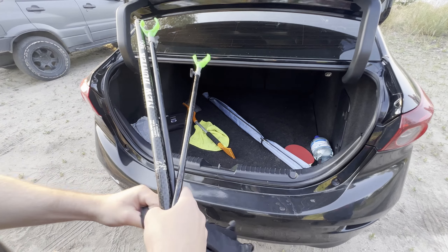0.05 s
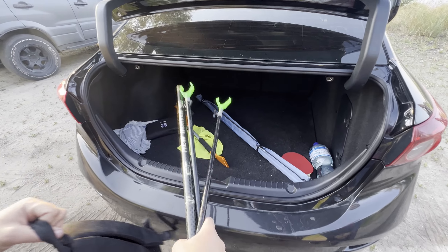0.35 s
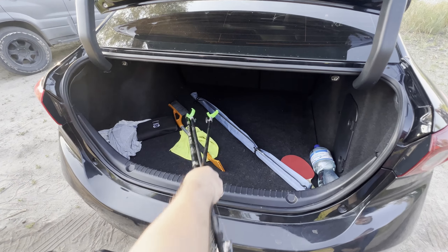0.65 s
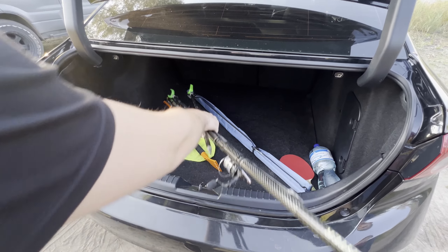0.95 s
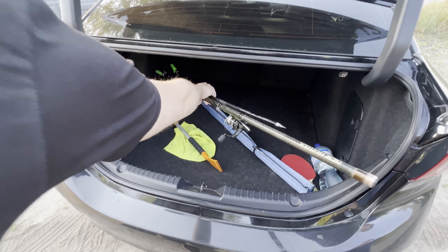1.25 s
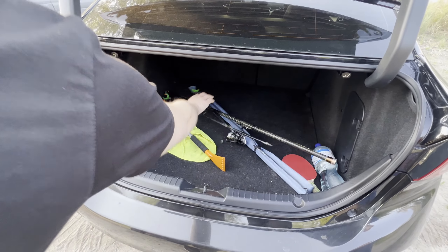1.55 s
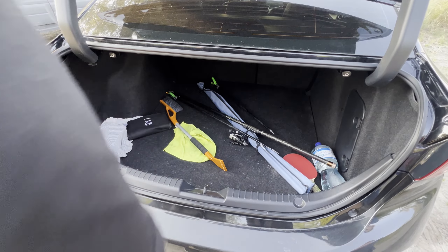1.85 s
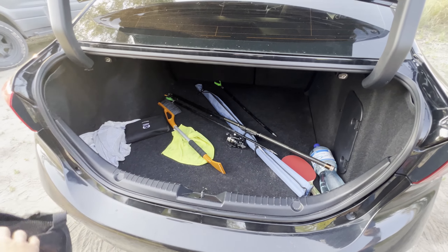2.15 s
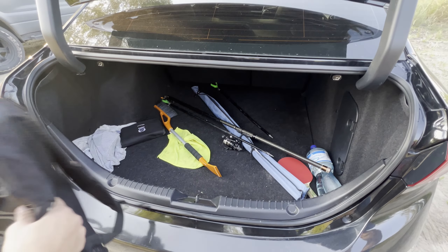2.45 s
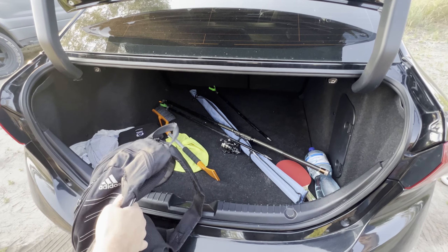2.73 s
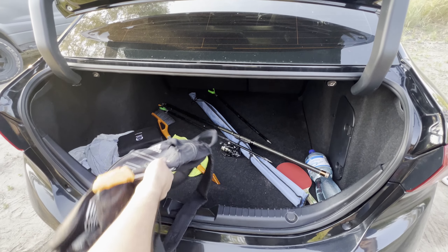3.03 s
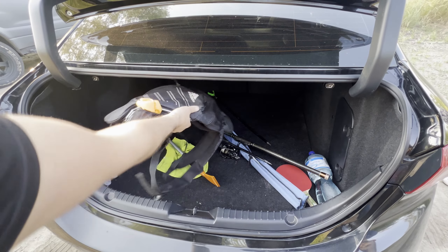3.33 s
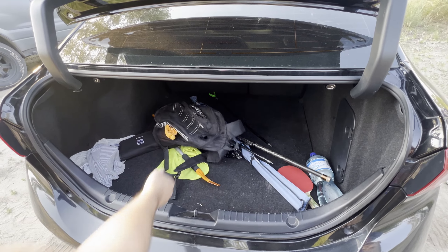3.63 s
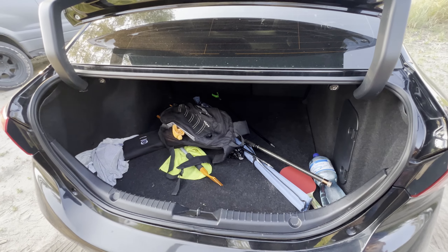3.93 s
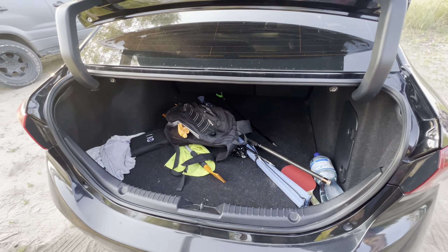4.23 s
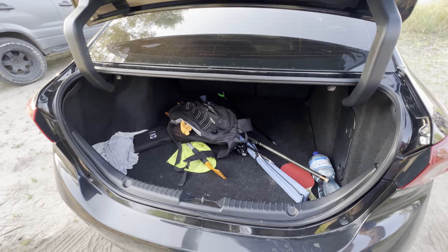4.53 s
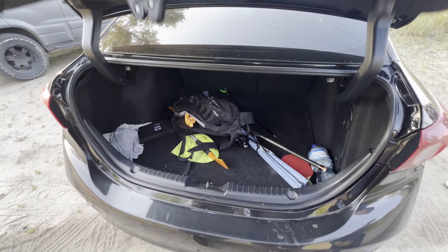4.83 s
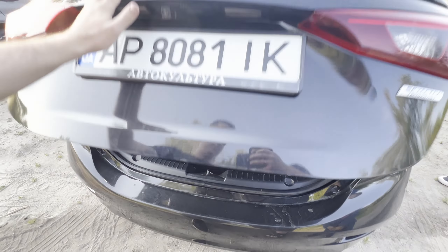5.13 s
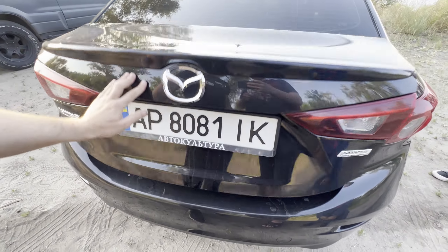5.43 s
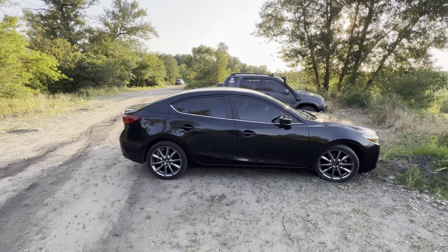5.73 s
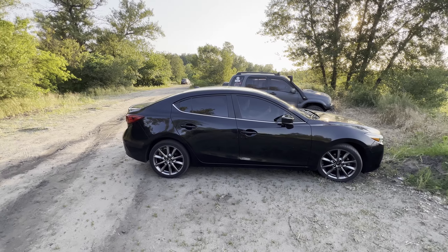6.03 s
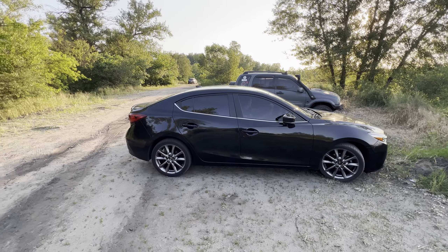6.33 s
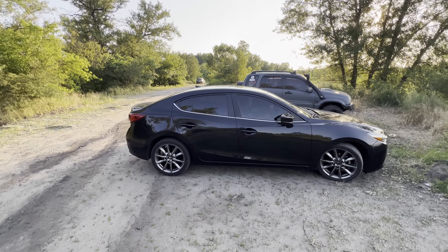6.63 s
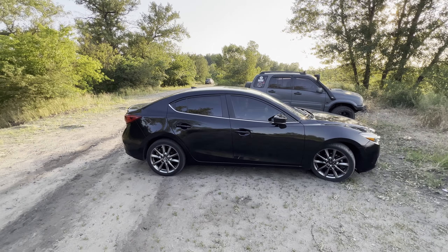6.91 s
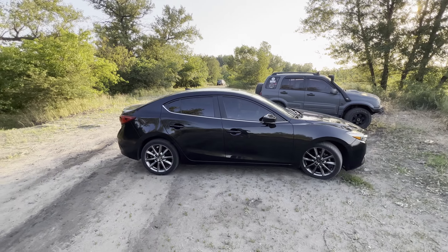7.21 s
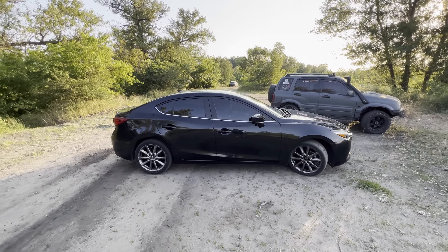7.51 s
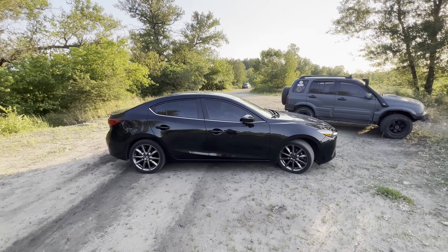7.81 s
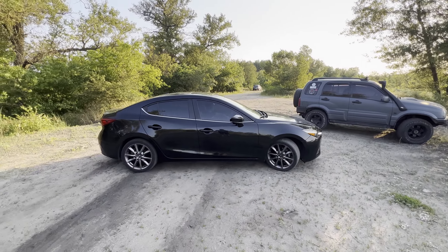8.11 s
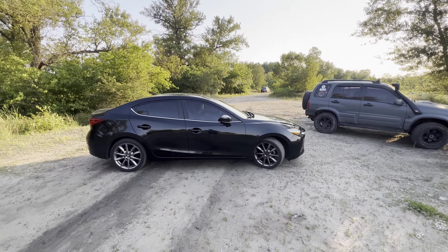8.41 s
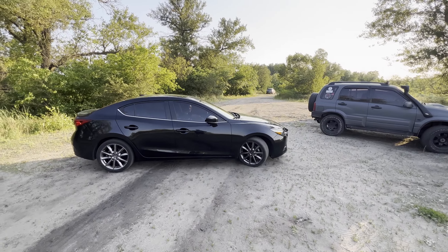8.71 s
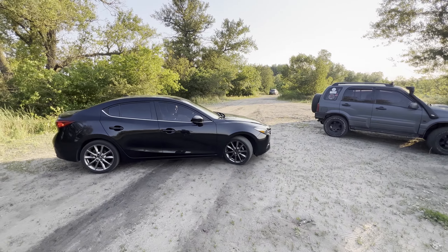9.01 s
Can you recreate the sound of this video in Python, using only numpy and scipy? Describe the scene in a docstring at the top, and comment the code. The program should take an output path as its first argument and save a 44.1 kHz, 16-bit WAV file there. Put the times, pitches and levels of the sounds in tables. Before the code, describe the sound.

Close to an open car boot outdoors, fishing rods clack and rattle onto the carpeted floor. A nylon backpack rustles and lands with a thud and a faint jingle of zip pulls. The hinges groan softly, a hand pats the lid, and it slams with a metallic boom. The sound then cuts to an off-road car some metres away, revving gently and crawling nearer over thin hiss and light wind.

```python
"""On a dirt track, close to a car's open boot, with thin outdoor hiss and light wind on the microphone.
Fishing rods clack and rattle onto the carpeted floor; a backpack follows with nylon rustle, jingling
zip pulls and a thud. The hinges groan, a hand pats the lid, and it slams: sheet metal rings, air booms.
Right after the slam the scene jumps to a spot some metres away, where an off-road car revs gently and
crawls past, exhaust pulsing and engine bay whirring, with ticks of stones and a few soft footsteps."""
import sys
import numpy as np
from scipy import signal
from scipy.fft import rfft, irfft, next_fast_len
from scipy.io import wavfile
from scipy.ndimage import uniform_filter1d

SR = 44100
rng = np.random.default_rng(int(sys.argv[2]) if len(sys.argv) > 2 else 0)


def materialize(psi):
    """Save the field psi as 16-bit PCM at rate SR to the path in sys.argv[1].

    A 1-D psi becomes a single channel; in a 2-D psi each row is a channel.
    """
    bounded = np.clip(np.atleast_2d(psi).T, -1, 1)
    quanta = np.round(bounded * 32767).astype(np.int16)
    wavfile.write(sys.argv[1], SR, quanta)


N = 399678
TIME = np.arange(N) / SR
AGE = TIME[:16384]  # seconds since a blow
JUMP_S = 5.667  # from the boot to the trackside

# Modes of the rod tubes and reel. Each row: frequency in Hz, level in dB, nominal t60 in seconds.
ROD_MODES = [(1237, -7, .05), (2517, -9, 0.11), (2980, -4, 0.079), (3284, 4.5, 0.039), (3700, -7, 0.044),
             (3920, 0, 0.044), (4770, -2, 0.058), (5047, 4, 0.051), (5980, -7, 0.045), (7000, -21, 0.055),
             (8110, -1, 0.049), (9060, -7, 0.09), (9800, -15, 0.14)]
# Spectrum of a hard contact. Each row: frequency in Hz, level in dB.
CLACK_SPECTRUM = [(200, -5.5), (450, -6.5), (1200, -1), (2000, -2.5), (3300, -1), (5500, -4.5), (9000, -9),
                  (15000, -14.5)]
# Spectrum of the struck lid. Each row: frequency in Hz, level in dB.
LID_SPECTRUM = [(88, -30), (150, -14), (283, -7.5), (350, -15), (416, -4.5), (701, -20), (1350, -11),
                (2140, -24), (5720, -28.5), (7640, -36), (8750, -34), (10400, -47), (15000, -52)]


def undb(db):
    """Decibels to gain."""
    return np.exp(np.asarray(db) * np.log(10) / 20)


def unit(x):
    """Scale to rms 1."""
    return x / np.sqrt(np.mean(x ** 2))


def curve(rows):
    """A line through rows of time in seconds and value."""
    return np.interp(TIME, *np.transpose(rows))


def response(hz, points):
    """Gain at hz of a spectrum given as rows of frequency in Hz and level in dB."""
    f, db = np.transpose(points)
    return undb(np.interp(np.log(hz + 1e-3), np.log(f), db))


def colour(x, points):
    """Give a sound a spectrum that falls away below its first point; rms 1."""
    size = next_fast_len(len(x), True)
    hz = np.fft.rfftfreq(size, 1 / SR)
    low_cut = np.minimum(hz / points[0][0], 1) ** 2
    return unit(irfft(rfft(x, size) * response(hz, points) * low_cut, size)[:len(x)])


def noise(points, size=N):
    """Coloured noise of rms 1."""
    return colour(rng.standard_normal(size), points)


def burst(points):
    """Coloured noise, long enough for one blow."""
    return noise(points, len(AGE))


def band(x, hz, width):
    """A resonance with gain 1 at its centre."""
    return signal.lfilter(*signal.iirpeak(hz, hz / width, fs=SR), x)


def walk(rate):
    """Smooth random wandering, with rate turns a second."""
    hold = int(SR / rate)
    steps = np.repeat(rng.standard_normal(N // hold + 1), hold)
    return 1.75 * uniform_filter1d(steps, hold)[:N]


def fade(t60, rise=0.00044):
    """Envelope of a blow: quick rise, exponential decay, top 1."""
    shape = (1 - np.exp(-AGE / rise)) * np.exp(-np.log(1000) * AGE / max(t60, .01))
    return shape / shape.max()


def swells(rows):
    """Gain of overlapping strokes; each grows 20 dB in its rise time and dies 20 dB in its fall time."""
    power = 0
    for s, db, rise, fall in rows:
        from_peak = np.maximum((s - TIME) / rise, (TIME - s) / fall)
        power += undb(db - 20 * np.minimum(from_peak, 10)) ** 2
    return np.sqrt(power)


def ring(modes):
    """Decaying modes (Hz, dB, t60 in seconds), struck at a new spot each time; starts near rms 1."""
    tones = 0
    for hz, db, t60 in modes:
        detuned_hz = hz * (1 + 0.0097 * (rng.random() - .5))
        tones += undb(db) * fade(t60) * np.sin(2 * np.pi * (detuned_hz * AGE + rng.random()))
    return tones / np.sqrt(sum(undb(db) ** 2 for _, db, _ in modes) / 2)


def add(out, s, sound):
    """Mix a sound in at s seconds."""
    i = int(s * SR)
    out[i:i + len(sound)] += sound[:N - i]


def outdoors(hiss_db=-51, breeze_db=-57.5, eddy_db=7.0):
    """Smooth distant hiss, and a low rumble from wind on the microphone and soft footsteps."""
    # Spectrum of the hiss. Each row: frequency in Hz, level in dB.
    hiss_spectrum = [(88, -43), (150, -2), (230, -11), (258, 3), (352, -4.5), (445, 0), (481, -3),
                     (827, -5), (1270, -5), (1660, -4.5), (2920, -7.5), (5870, -2), (7560, -12.5),
                     (8490, -7), (15500, -46)]
    # Drift of the hiss. Each row: time in seconds, gain in dB.
    hiss_drift = [(.3, -2), (1.0, 0), (3.9, -1), (4.9, -2.6), (5.6, -1.5)]
    # Low swells of rumble: wind gusts and soft footstep thumps.
    # Each row: peak time in seconds, level in dB, rise and fall in seconds.
    low_swells = [(.22, -46, 0.15, 0.41), (2.02, -48.5, 0.28, 0.44), (2.66, -48, 0.087, 0.21),
                  (4.45, -49, 1, 1), (7.68, -42.5, 0.11, 0.22), (8.49, -43, 0.049, .12),
                  (8.73, -40.5, 0.19, 0.16), (8.9, -35, 0.22, 0.21), (9.04, -37, .07, .2)]
    rumble = noise([(48, -4), (62, 6.0), (110, -4.5), (180, -7.5), (300, -18), (1000, -42), (5000, -75)])
    hiss = noise(hiss_spectrum) * undb(hiss_db + curve(hiss_drift))
    eddies = undb(eddy_db * np.tanh(walk(15)))
    return hiss + rumble * np.hypot(swells(low_swells), undb(breeze_db)) * eddies


def tinks(gain_db=-8, width=0.32, click_db=-12):
    """Buckles and grit tick in one narrow range, with a faint broad click."""
    # Tiny contacts. Each row: start in seconds, level in dB, pitch in Hz, t60 in seconds.
    contacts = [(1.979, -45, 11400, .046), (3.478, -26, 12300, 0.073), (3.675, -31, 7600, 0.053),
                (4.011, -42, 1950, 0.026), (4.18, -36.5, 2630, 0.032), (6.329, -36, 3430, .1),
                (7.725, -28, 5700, 0.025)]
    out = np.zeros(N)
    for s, db, hz, t60 in contacts:
        white = rng.standard_normal(len(AGE))
        tone = unit(band(band(white, hz, width * hz), hz, width * hz))
        click = undb(click_db) * burst(CLACK_SPECTRUM)
        add(out, s, undb(db + gain_db) * (tone + click) * fade(t60))
    return out


def zips(gain_db=-9, spot_db=4):
    """A metal zip pull swings against its slider and rings, a little differently each time."""
    # Swings of the pull. Each row: start in seconds, level in dB.
    jingles = [(2.816, -45), (2.965, -46), (3.43, -47), (3.479, -38)]
    # Modes of the pull. Each row: frequency in Hz, level in dB, t60 in seconds.
    pull_modes = [(9450, 1, .09), (12300, -7, .07), (15250, -4, .1)]
    out = np.zeros(N)
    for s, db in jingles:
        modes = [(hz, level + spot_db * rng.standard_normal(), t60) for hz, level, t60 in pull_modes]
        add(out, s, undb(db + gain_db) * ring(modes))
    return out


def cloth(grain_db=4, catch_db=3.0, crinkle_db=-4, folds_per_s=90, whisper_db=-85):
    """Nylon threads catch and slip, folds crinkle; lighter fabric whispers in the high treble."""
    # Backpack strokes. Each row: peak time in seconds, level in dB, rise and fall in seconds.
    strokes = [(2.66, -39, 0.31, 0.21), (2.672, -31, 0.071, 0.059), (3.11, -47.5, 0.67, 0.23),
               (3.575, -31.5, 0.094, 0.11), (3.73, -42.5, 0.37, 0.29)]
    # Spectrum of the nylon. Each row: frequency in Hz, level in dB.
    nylon_spectrum = [(120, -26), (200, -16.5), (443, -5), (512, -7), (760, -6.5), (1150, -7),
                      (1910, -21.5), (3290, -18.5), (5260, -29), (6530, -21), (15000, -45)]
    # Sleeve and straps. Each row: peak time in seconds, level in dB, rise and fall in seconds.
    brushes = [(.304, -63, .1, 0.2), (2.23, -62, .3, .2), (2.652, -62, 0.27, 0.33), (3.352, -54, .14, .07)]
    slips = rng.standard_normal(N) * undb(grain_db * np.tanh(walk(400)) + catch_db * np.tanh(walk(60)))
    folds = (rng.random(N) < folds_per_s / SR) * rng.random(N)
    crinkle = signal.fftconvolve(folds, rng.standard_normal(len(AGE)) * fade(t60=.012))[:N]
    rustle = colour(unit(slips) + undb(crinkle_db) * unit(crinkle), nylon_spectrum)
    brushing = swells(brushes) + undb(whisper_db + 3 * walk(8))
    whisper = noise([(6000, -20), (10000, -5), (12500, 0), (16000, 0)])
    return rustle * swells(strokes) + whisper * brushing


def knocks(body_db=-11, tick_db=-14, width=0.36):
    """Gear and stones knock dully: one broad resonance and a short tick."""
    # Light knocks. Each row: start in seconds, level in dB, pitch in Hz, t60 in seconds.
    hits = [(0.138, -29.5, 1290, 0.047), (1.505, -5.5, 415, .05), (2.158, -26, 337, 0.052),
            (2.178, -14.5, 840, .03), (2.473, -32, 920, 0.028), (2.512, -29, 685, 0.025),
            (2.64, -24, 980, 0.068), (2.764, -24.5, 820, 0.042), (3.107, -21, 1110, 0.11),
            (3.544, -10, 495, 0.032), (3.604, -13, 635, .031), (7.646, -32.5, 1210, 0.044),
            (8.663, -20, 1450, 0.037), (8.688, -31, 320, .05)]
    out = np.zeros(N)
    for s, db, hz, t60 in hits:
        push = burst([(200, 12.0), (2000, -6), (8000, -12)])
        body = unit(band(push, hz, width * hz)) * fade(t60, rise=0.00097)
        tick = burst([(300, 12.5), (900, -1.0), (1700, 3.5), (3000, -7.5), (12000, -30.5)]) * fade(t60)
        add(out, s, undb(db) * (undb(body_db) * body + undb(tick_db) * tick))
    return out


def palm(start_s=5.071, db=-33.5, hz=490, width=0.17):
    """A hand lands on the lid: a soft, hollow pat on sheet metal."""
    out = np.zeros(N)
    pat = unit(band(burst(LID_SPECTRUM), hz, width * hz))
    add(out, start_s, undb(db) * pat * fade(t60=0.065, rise=.002))
    return out


def hinges(slips_per_s=120):
    """Uneven slips in the hinges shake the low modes of the lid as it is pulled down."""
    # Pulls on the lid. Each row: peak time in seconds, level in dB, rise and fall in seconds.
    pulls = [(4.69, -41, 0.24, .34), (4.785, -33.5, 0.055, .08)]
    # Groaning modes. Each row: frequency in Hz, half the filter width in Hz, level in dB.
    modes = [(124, 8.3, -7), (155, 5.6, -0.5), (168.6, 7.8, 1.5), (197.6, 5.2, -4), (413, 25, -24)]
    slips = (rng.random(N) < slips_per_s / SR) * rng.standard_normal(N)
    groan = sum(undb(db) * band(band(slips, hz, 2 * half), hz, 2 * half) for hz, half, db in modes)
    running_rms = np.sqrt(uniform_filter1d(groan ** 2, SR // 20) + 1e-12)
    return groan / running_rms * swells(pulls)


def reel_rattle(taps_per_s=260, ring_db=-17, gain_db=-2):
    """Loose reel parts chatter at random against the tubes as the rods settle."""
    # Flurries of taps. Each row: peak time in seconds, level in dB, rise and fall in seconds.
    flurries = [(1.545, -31, 0.066, 0.079), (1.7, -29.5, 0.077, 0.095)]
    clicks = (rng.random(N) < taps_per_s / SR) * (rng.random(N) - .5)
    tap = burst(CLACK_SPECTRUM) * fade(t60=0.014) + undb(ring_db) * ring(ROD_MODES)
    return unit(signal.fftconvolve(clicks, tap)[:N]) * swells(flurries) * undb(gain_db)


def floor_thuds(rumble_db=-26, sink_s=0.0041):
    """The carpeted floor gives and the boot rumbles; harder loads ring higher modes and rustle more."""
    # Soft loads on floor and body. Each row: start in seconds, level in dB, main ring in Hz,
    # nominal t60 in seconds, hardness in dB per octave.
    loads = [(0.131, -26.5, 190, .28, -22), (0.148, -28.5, 164, 0.26, -14), (1.493, -7.5, 116, 0.088, 1.5),
             (1.524, -17.5, 64, 0.12, -2), (1.616, -22.5, 106.6, 0.1, -5), (1.681, -26.5, 128, .1, -2),
             (1.898, -22, 126.3, .12, 3.5), (2.656, -39.5, 123, .12, 3), (3.002, -38, 119, 0.052, 6.5),
             (3.11, -23.5, 121.6, 0.1, 22), (3.27, -37.5, 127, 0.048, 2), (3.506, -25.5, 124, 0.039, 7),
             (3.548, -7, 118, 0.063, -0.5), (3.608, -33.5, 89.7, 0.38, -4), (5.08, -32, 166.6, 0.18, -16)]
    # Floor modes. Each row: multiple of the main ring, level in dB, multiple of the load's t60.
    modes = [(.53, -11, 1.67), (1, 1, 1.04), (1.7, -5.5, .8), (2.6, -14.5, 0.23), (3.6, -9.5, 0.39)]
    out = np.zeros(N)
    for s, db, hz, t60, hardness in loads:
        gains = undb([level + hardness * np.log2(max(ratio, 1)) for ratio, level, _ in modes])
        for gain, (ratio, _, share) in zip(gains / gains.max(), modes):
            tone = np.sin(2 * np.pi * ratio * hz * AGE) * fade(share * t60, rise=0.0033)
            add(out, s + sink_s / ratio, undb(db) * gain * tone)  # low modes start later
        rustle = burst([(200, 1.5), (450, 4.0), (800, -5.5), (1400, -14), (3000, -21.5), (12000, -36.5)])
        rustle *= undb(-12 + 0.23 * min(hardness, 0)) * fade(t60=0.12, rise=0.0031)
        rumble = burst([(50, -12), (110, -5), (250, -18), (600, -15), (2000, -27), (8000, -70)])
        rumble *= undb(rumble_db) * fade(t60=.42, rise=0.014)
        add(out, s, undb(db) * (rustle + rumble))
    return out


def rod_clacks(crack_db=-12, echo_db=-26, ring_db=-15.5, focus_db=7, spot_db=5,
               bounce_db=-14, bounce_s=.009, release_s=1.55):
    """Hard tubes collide: a short crack, ringing walls, a quick echo from the boot and a weaker bounce."""
    # Rods, reel and buckles hitting. Each row: start in seconds, level in dB, brightness in dB,
    # emphasised frequency in Hz.
    contacts = [(0.0675, -23.5, -34, 1690), (1.284, -31, -32, 3330), (1.3571, -22.5, -30, 1100),
                (1.3706, -17, -23, 1820), (1.4024, -13.5, -22, 3360), (1.4845, -21, -9, 3060),
                (1.507, -8, -21, 990), (1.5299, -16.5, 0.5, 4940), (1.5392, -8, -11, 3130),
                (1.56, -15.5, -2.5, 3320), (1.5905, -16.5, -10, 3100), (1.6133, -16, -20, 4570),
                (1.6427, -22.5, -7, 3270), (1.6603, -16, -5, 5130), (1.6694, -12, -22, 2920),
                (1.6797, -11, -37, 3200), (1.705, -14, -26, 5130), (1.718, -8.5, -11.5, 5840),
                (1.772, -16.5, 1, 2930), (1.8029, -14, -24, 1340), (3.479, -26, -17, 1790),
                (3.579, -15.5, -17, 2900), (3.6054, -30, -24, 1340), (3.73, -30, -16, 1260)]
    out = np.zeros(N)
    for s, db, brightness, hz in contacts:
        sustain = .6 if s < release_s else 1  # the hand damps the rods until it lets go
        # The contact point frees some modes and damps others.
        offsets_db = spot_db * rng.standard_normal(len(ROD_MODES))
        tubes = ring([(f, level + offset, sustain * t60 * undb(np.clip(offset, -6, 2)))
                      for (f, level, t60), offset in zip(ROD_MODES, offsets_db)])
        crack = undb(crack_db) * fade(t60=0.035, rise=0.0015)
        echo = undb(echo_db) * fade(t60=sustain * 0.12, rise=0.0076)
        hit = burst(CLACK_SPECTRUM) * (crack + echo) + undb(ring_db) * tubes
        hit += (undb(focus_db) - 1) * band(hit, hz, hz / 4)
        treble_db = 0.77 * (brightness + 15)  # harder contact is brighter
        hit += (undb(treble_db) - 1) * band(hit, hz=11500, width=8300)
        add(out, s, undb(db) * hit)
        add(out, s + bounce_s * (.5 + rng.random()), undb(db + bounce_db) * hit)
    return out


def engine(cruise_hz=30, exhaust_db=-47.0, bay_db=-52.0, nearing_db_per_s=1.15, uneven_db=1.7):
    """Some metres off, firing pulses ring the exhaust; the nearing engine bay whirrs and throbs in step."""
    # Engine speed. Each row: time in seconds, firings a second.
    firing_rate = [(5.7, 20.8), (5.9, 21.7), (6.1, 24), (6.31, 31.5), (6.64, 36.5), (6.86, 40.4),
                   (7.08, 43.2), (7.83, 30.0), (8.69, 27.5), (8.81, 30.3), (9.05, 27.8)]
    # Exhaust resonances. Each row: frequency in Hz, level in dB.
    exhaust_spectrum = [(20, -14), (29, -11), (42, 2), (58, -10.5), (80, -1), (95, 6.5), (112, -5.5),
                        (140, -8.5), (180, -11.5), (210, -11), (258, -11), (290, -19.5), (330, -14),
                        (365, -23.5), (405, -13), (460, -23.5)]
    # Whirr of the engine bay. Each row: frequency in Hz, level in dB.
    bay_spectrum = [(60, -2), (150, -3.5), (280, 1), (420, -4), (620, -9.5), (850, 0), (1100, -8),
                    (1500, -2.5), (2400, -11.5), (4000, -8.5), (7000, -14), (15000, -33.5)]
    speed = uniform_filter1d(curve(firing_rate), SR // 6)
    revs = np.log2(speed / cruise_hz)  # octaves above cruising speed
    throttle = np.clip(np.gradient(revs) * SR, -1, 1)  # octaves gained per second
    hz = speed * (1 + 0.0018 * walk(12))
    phase = 2 * np.pi * np.cumsum(hz) / SR
    on = TIME > JUMP_S
    exhaust = np.zeros(N)
    for k in range(1, 15):
        flutter = 1 + 0.2 * min(k / 6, 1) * walk(18)[on]  # firings differ, most in the overtones
        harmonic = np.sin(k * phase[on] + 2 * np.pi * rng.random())
        exhaust[on] += response(k * hz[on], exhaust_spectrum) * flutter * harmonic
    exhaust *= undb(exhaust_db + 8 * revs + 4 * throttle + uneven_db * walk(30))
    bay_gain = undb(bay_db + 5 * revs + nearing_db_per_s * (TIME - JUMP_S) + .5 * walk(20))
    throb = 1 + 0.14 * np.cos(phase)
    return exhaust + noise(bay_spectrum) * throb * bay_gain


def lid_slam(clash_db=-8.7, sheet_db=-19.0, boom_db=-1, latch_db=-8, body_db=-23):
    """Close up, sheet metal clashes and rings, the latch snaps, trapped air booms and the body shudders."""
    # The lid meets latch and seal. Each row: start in seconds, level in dB, t60 in seconds.
    blows = [(5.518, -21, 0.16), (5.526, -15, 0.086), (5.5305, -7.5, 0.11), (5.538, -10, 0.17),
             (5.549, -12, 0.15), (5.603, -17, 0.14)]
    # Sheet metal modes. Each row: frequency in Hz, level in dB, nominal t60 in seconds.
    sheet_modes = [(279.5, -3.5, 0.61), (410, 0, 0.28), (604, -9, 0.36), (771, -10, 0.55), (906, -17, 0.56),
                   (996, -11, 0.45), (1190, -1.5, 0.2), (1320, -22, 0.22), (1404, -15.5, 0.79),
                   (1544, -11, 0.26), (1736, -20, 0.33), (1840, -13.5, 0.37)]
    # Air in the boot and body. Each row: start in seconds, frequency in Hz, level in dB, t60 in seconds.
    air_modes = [(5.54, 61.2, -11, .36), (5.542, 83, -10, 0.4), (5.534, 42.5, -20, 0.34),
                 (5.543, 150, -27, 0.24), (5.558, 165, -21.5, .4), (5.547, 250, -24, 0.39)]
    out = np.zeros(N)
    for s, db, t60 in blows:
        clash = burst(LID_SPECTRUM) * fade(t60, rise=0.00078)
        sheet = ring([(hz, level, 0.86 * decay) for hz, level, decay in sheet_modes])
        add(out, s, undb(db) * (undb(clash_db) * clash + undb(sheet_db) * sheet))
    latch = ring([(706, -0.75, 0.013), (950, 1, 0.01), (1360, -3.7, 0.024)])
    add(out, blows[2][0], undb(latch_db) * latch)  # on the hardest blow
    for s, hz, db, t60 in air_modes:
        add(out, s, undb(db + boom_db) * np.sin(2 * np.pi * hz * AGE) * fade(t60, rise=0.0042))
    shudder = burst([(45, -9), (70, -14), (130, 1), (300, -7.5), (600, -15.5), (3000, -65)])
    add(out, air_modes[0][0], undb(body_db) * shudder * fade(t60=0.47, rise=0.014))
    return out


def scene():
    """One microphone, first at the boot, then beside the track."""
    foreground = rod_clacks() + reel_rattle() + zips() + tinks() + floor_thuds() + knocks()
    foreground = foreground + palm() + lid_slam() + hinges() + cloth()
    trackside = np.clip((TIME - JUMP_S) / .003, 0, 1)
    # The slam's tail ends at the jump; the gate reopens for the stones and grit.
    gate = np.where(TIME < JUMP_S + .5, 1 - trackside, 1)
    return (foreground * gate + engine() * trackside + outdoors())[None]


def record(dry, bottom_hz=28, top_hz=15900):
    """The microphone drops the deepest bass and has two narrow dips in the treble; the top is cut."""
    # Treble dips. Each row: centre in Hz, width in Hz, gain in dB.
    notches = [(5345, 156, -28), (7500, 400, -24)]
    dry = signal.sosfilt(signal.butter(2, bottom_hz, "high", fs=SR, output="sos"), dry)
    for hz, width, db in notches:
        dry = dry - (1 - undb(db)) * band(dry, hz, width)
    return signal.sosfilt(signal.ellip(10, .2, 80, top_hz, fs=SR, output="sos"), dry)


dry = scene()
out = record(dry)
materialize(out)
```